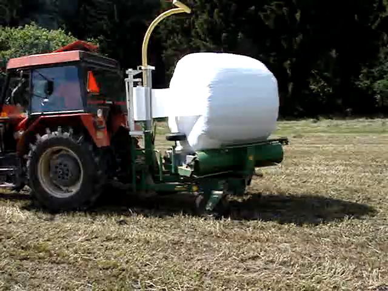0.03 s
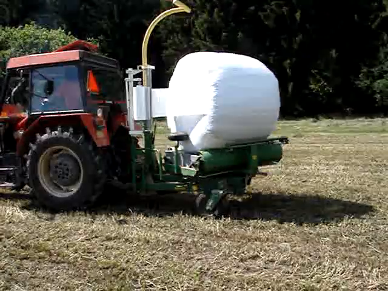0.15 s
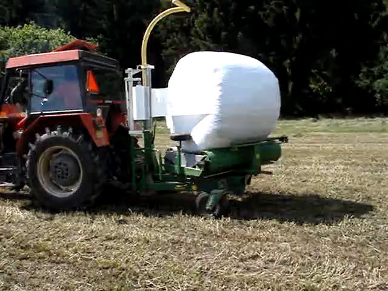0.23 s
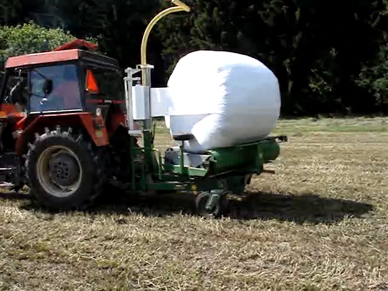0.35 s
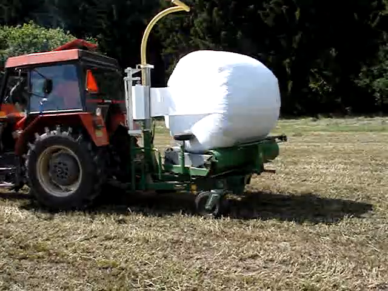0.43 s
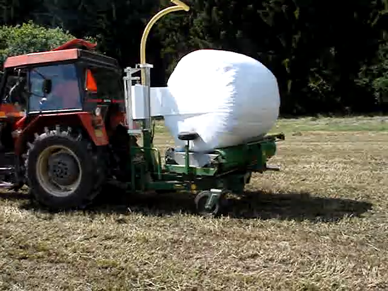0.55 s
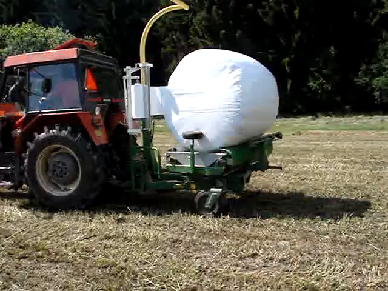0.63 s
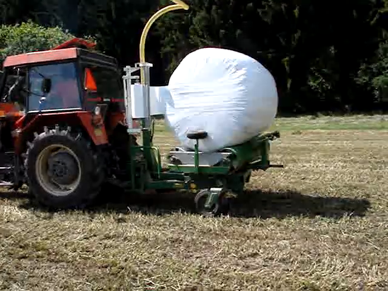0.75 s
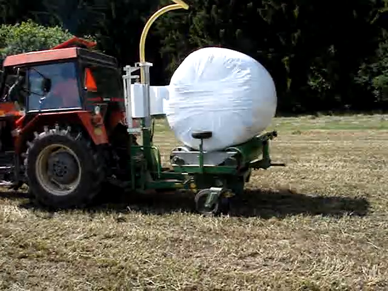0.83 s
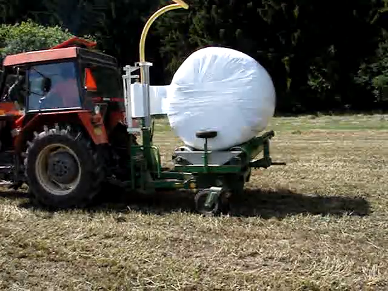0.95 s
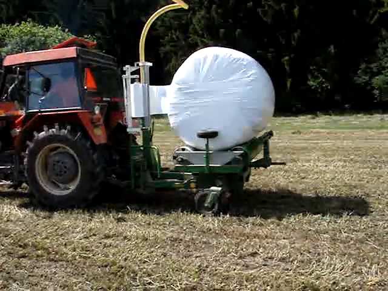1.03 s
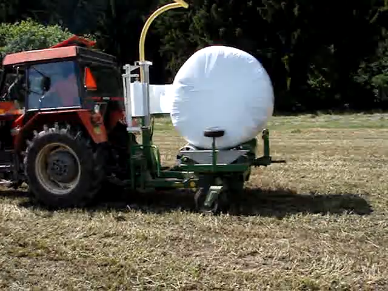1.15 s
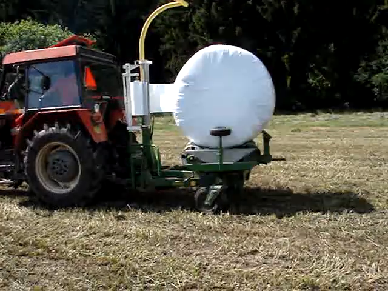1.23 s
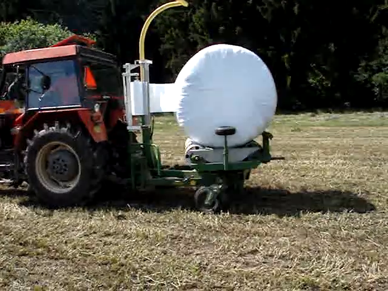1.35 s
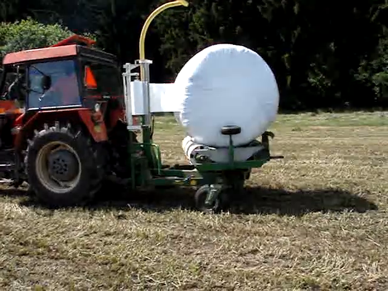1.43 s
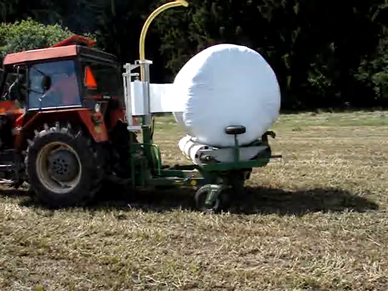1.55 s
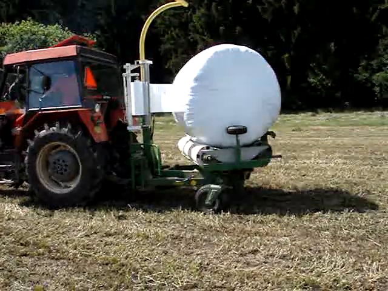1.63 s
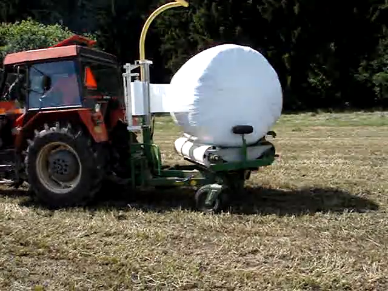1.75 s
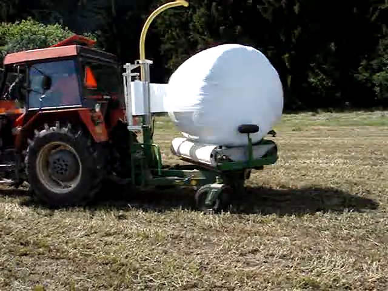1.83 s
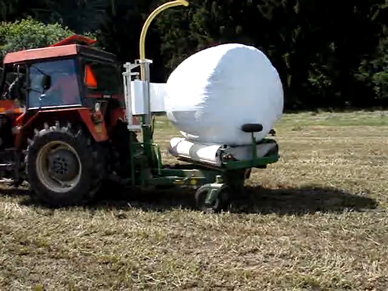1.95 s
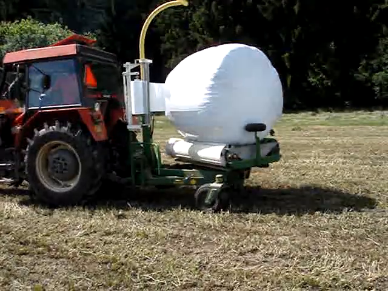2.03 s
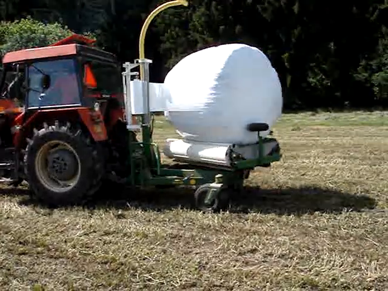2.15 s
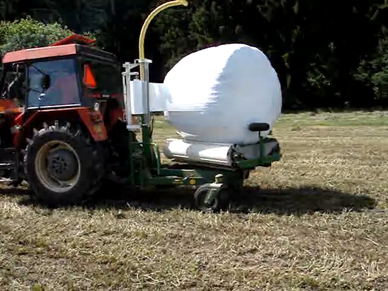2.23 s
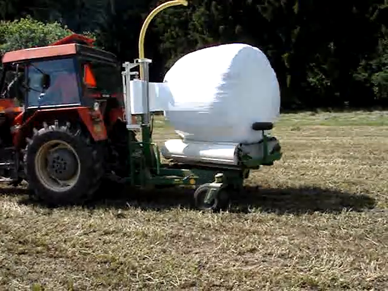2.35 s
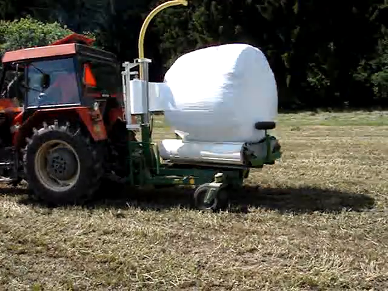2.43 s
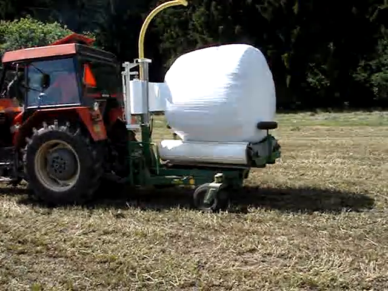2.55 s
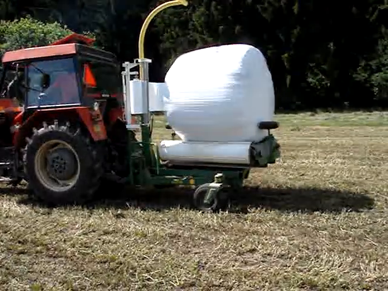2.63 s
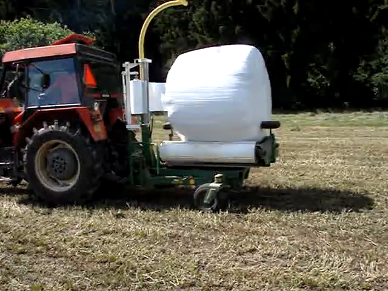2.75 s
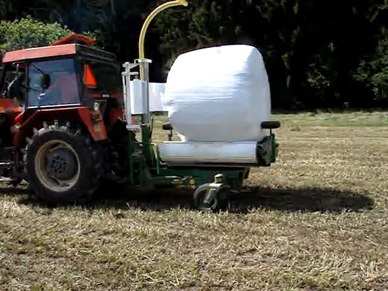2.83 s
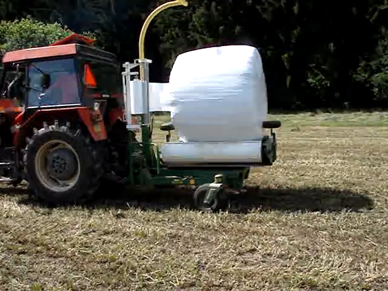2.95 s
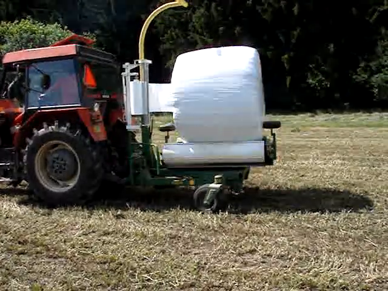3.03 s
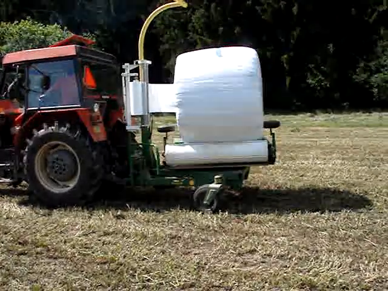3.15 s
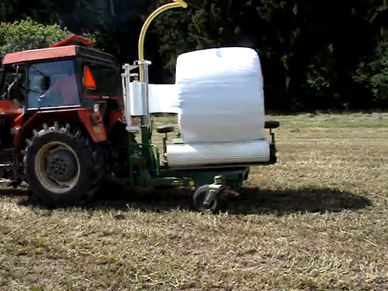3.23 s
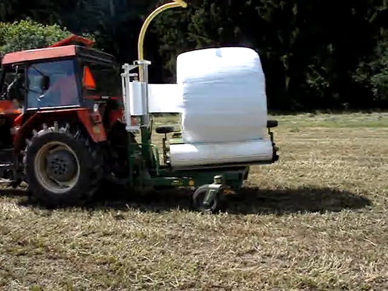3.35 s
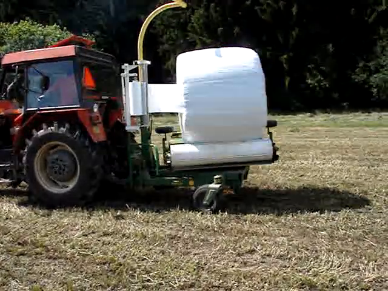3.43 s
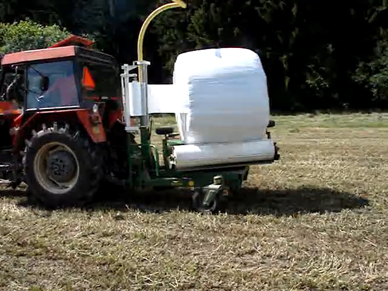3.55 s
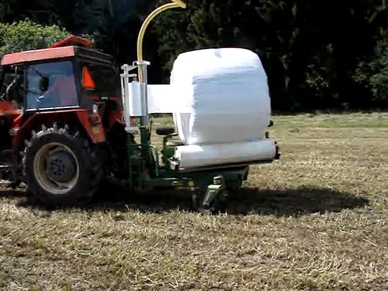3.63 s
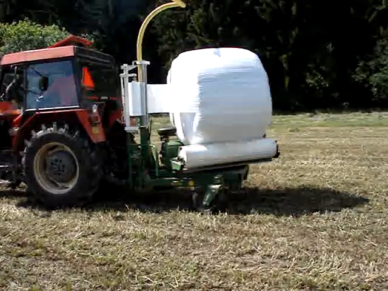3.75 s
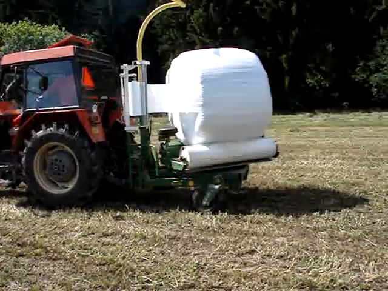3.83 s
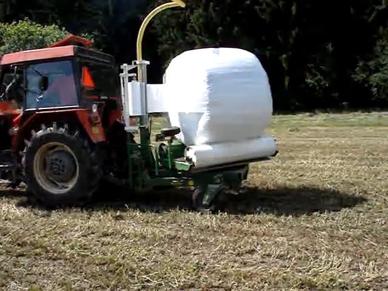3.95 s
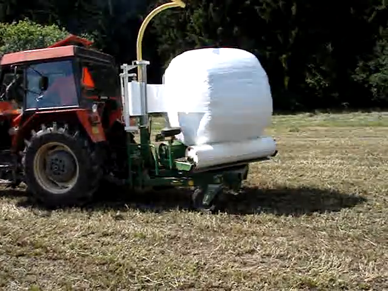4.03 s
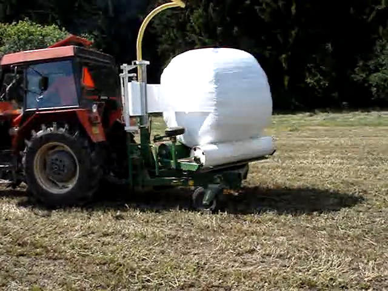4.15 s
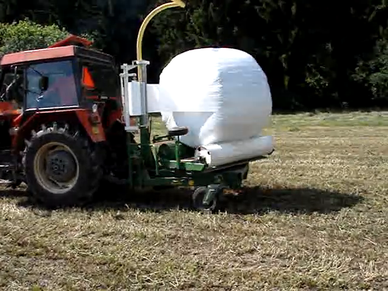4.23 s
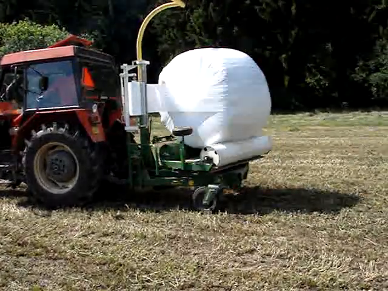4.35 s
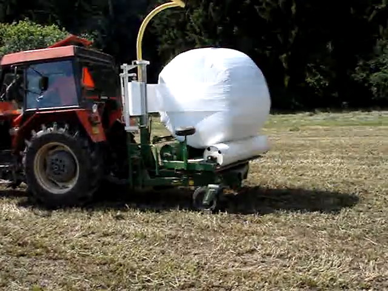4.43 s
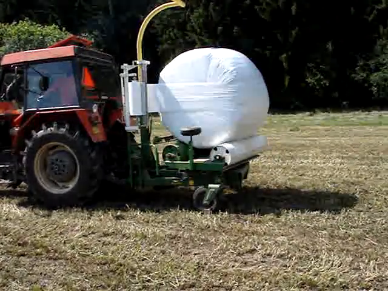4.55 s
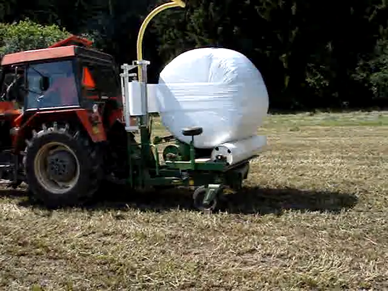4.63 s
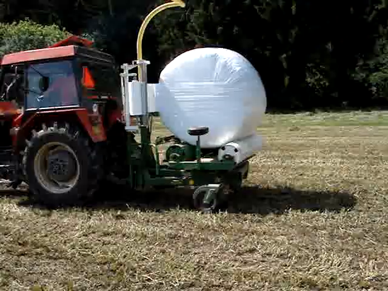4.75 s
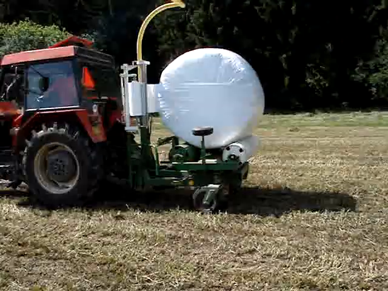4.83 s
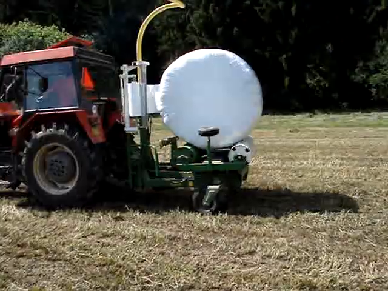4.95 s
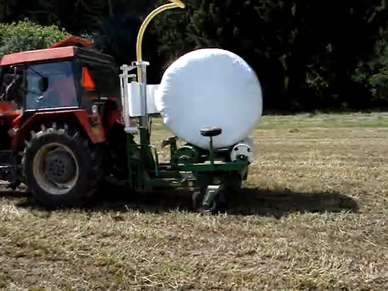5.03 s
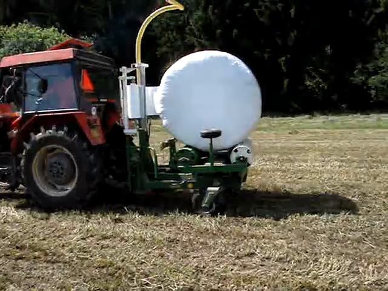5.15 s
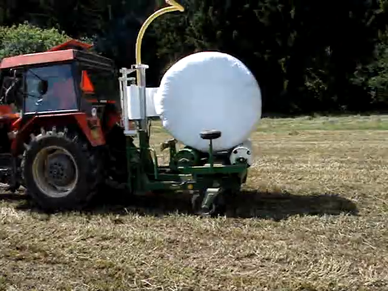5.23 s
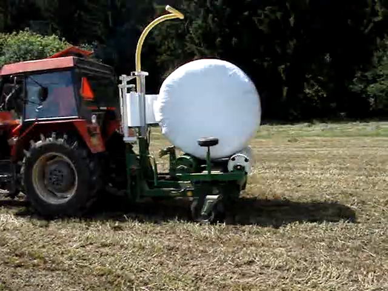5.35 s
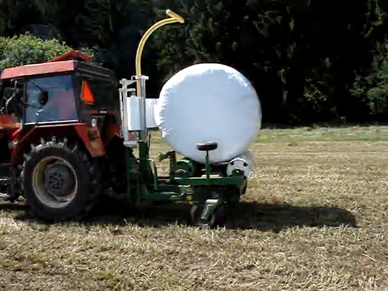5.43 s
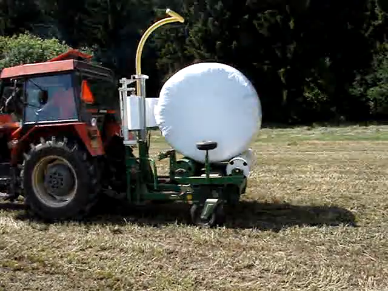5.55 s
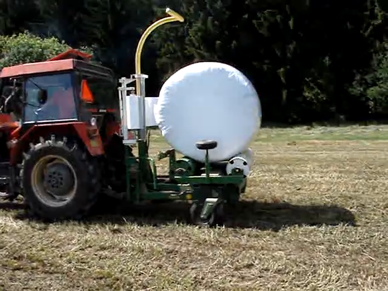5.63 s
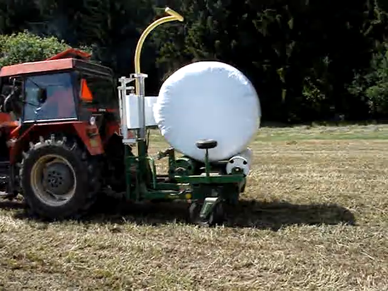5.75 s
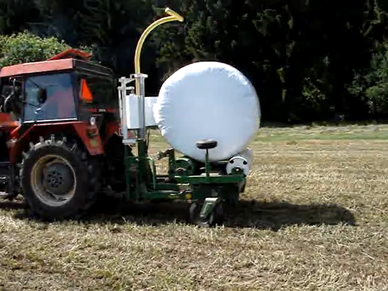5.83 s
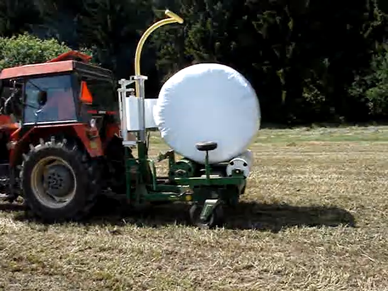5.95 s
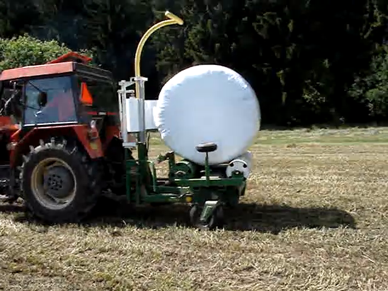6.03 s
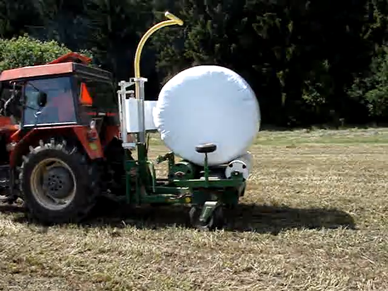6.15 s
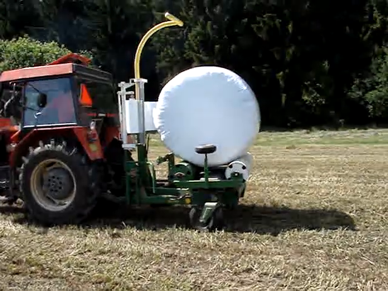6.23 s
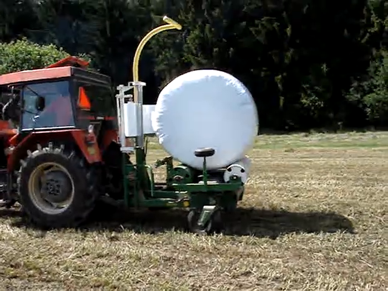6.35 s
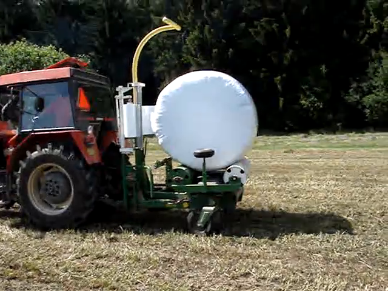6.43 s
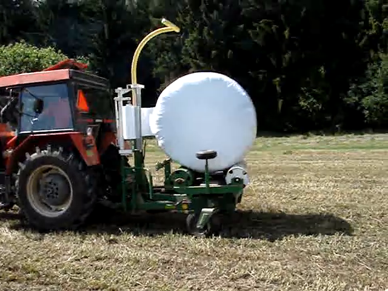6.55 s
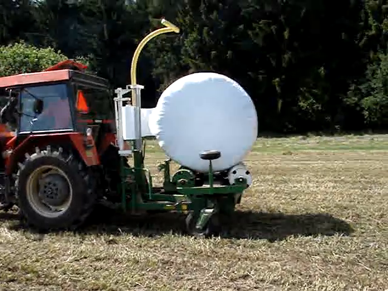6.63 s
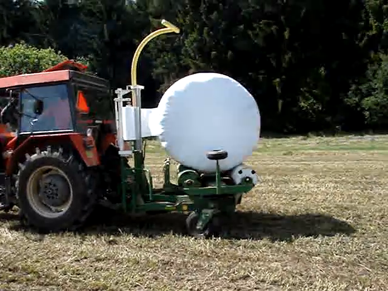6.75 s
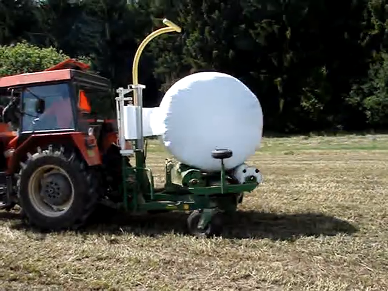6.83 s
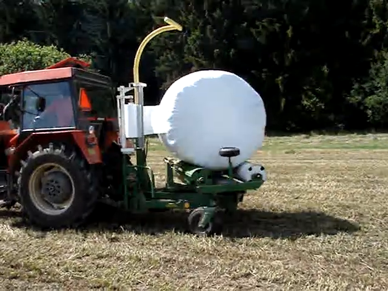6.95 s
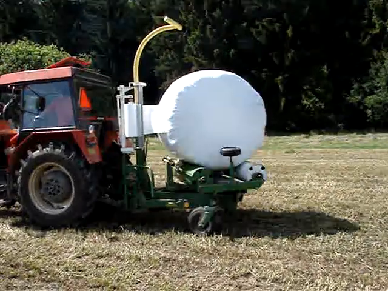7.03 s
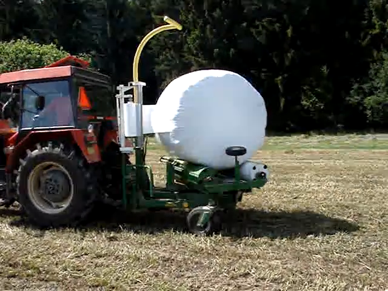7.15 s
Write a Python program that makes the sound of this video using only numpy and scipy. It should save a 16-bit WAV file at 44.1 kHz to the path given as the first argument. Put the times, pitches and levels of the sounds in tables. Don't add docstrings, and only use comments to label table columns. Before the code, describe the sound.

In an open field, stretch film peels off a roll with a dense, dry, ripping crackle and frequent sharp snaps. After about five seconds it brakes quickly to silence, exposing a knocking, humming diesel idle that slowly grows louder. A short steel scrape and clank follows, then the film grabs and tears loudly again. Single microphone, mono, with dulled top end.

```python
import sys
import numpy as np
from scipy import signal
from scipy.fft import rfft, irfft
from scipy.io import wavfile
from scipy.ndimage import uniform_filter1d

SR = 44100
rng = np.random.default_rng(int(sys.argv[2]) if len(sys.argv) > 2 else 0)


def gain_from_decibels(decibels):
    exponent = np.asarray(decibels, float) / 20
    return 10 ** exponent


def transcribe(u):
    v = np.clip(np.atleast_2d(u).T, -1, 1)
    q = np.round(v * 32767).astype(np.int16)
    wavfile.write(sys.argv[1], SR, q)


N = 317066
HALT_S, TIGHT_S = 5.22, 6.658

# frequency in Hz, width in Hz, level in dB.
WEB_MODES = [(355, 88, -26), (630, 157, -11), (787.4, 171, -3), (1118, 323, -7), (1267, 330, -1),
             (1434, 275, -6), (1704, 273, -7), (1929, 290, -10), (2340, 1500, -23), (2770, 1060, -10.5),
             (3265, 490, -12), (3658, 445, -11.5), (4720, 1600, -20), (6220, 1700, -15), (7146, 1800, -14),
             (8930, 2800, -24)]


def rms_one(x):
    return x / np.sqrt(np.mean(x ** 2) + 1e-20)


def drift(rate):
    r = np.exp(-40 * np.pi * rate / SR)
    slow = signal.lfilter([1], [1, -2 * r, r * r], rng.standard_normal(N // 20 + 2002))[2000:]
    return np.interp(np.arange(N) / 20, np.arange(len(slow)), rms_one(slow))


def step(at_s, width_s):
    return 0.5 + 0.5 * np.tanh((np.arange(N) / SR - at_s) / (2 * width_s))


def bumps(rows, width_s):
    t = np.arange(N) / SR
    return sum(db * np.exp(-((t - s) / width_s) ** 2) for s, db in rows)


def band_noise(low_hz, high_hz):
    sos = signal.butter(2, [low_hz, high_hz], "band", fs=SR, output="sos")
    return signal.sosfilt(sos, rng.standard_normal(N))


def dying(clicks, t60):
    return signal.lfilter([1], [1, -gain_from_decibels(-60 / (t60 * SR))], clicks + 1e-18)


def resonance(x, hz, width):
    r = np.exp(-np.pi * width / SR)
    zeros = (1 - r * r) / 2 * np.array([1, 0, -1])
    return signal.lfilter(zeros, [1, -2 * r * np.cos(2 * np.pi * hz / SR), r * r], x)


def mode(x, hz, width):
    return resonance(resonance(x, hz, width), hz, width)


def running_noise():
    # frequency in Hz, density in dB per Hz.
    spectrum = [(24, -53), (40, -18.5), (135, -3), (200, 2), (459, 0), (937, 4), (1080, -9), (1350, -3.5),
                (1740, 1.5), (2830, -4.5), (3250, -12), (3730, -11.5), (5140, -23), (6040, -13.5),
                (9800, -27.5), (12700, -69), (21600, -120)]
    curve_hz, curve_db = np.transpose(spectrum)
    hz = np.maximum(np.fft.rfftfreq(N, 1 / SR), 1)
    shape = gain_from_decibels(np.interp(np.log(hz), np.log(curve_hz), curve_db))
    return gain_from_decibels(-35.5) * rms_one(irfft(rfft(rng.standard_normal(N)) * shape, N))


def firings():
    firing_s, cycle_s = 6.025, 0.17425
    ahead_s = 0.0165 * (1 - step(5.43, 0.09))
    return 4 * (np.arange(N) / SR + ahead_s - firing_s) / cycle_s


def pipe_opening():
    # time in seconds, lift in dB.
    glimpses = [
        (3.6, 7.5),
        (4.5, 11),
    ]
    turning_db, resting_db = -2.5, 8.5
    resting = step(5.48, 0.069) - step(6.75, 0.048)
    return turning_db + (resting_db - turning_db) * resting + bumps(glimpses, 0.25)


def exhaust_hum(turn):
    # multiple of the firing rate, level in dB rms.
    orders = [(2, -67.5), (3, -62), (4, -63.5), (5, -65.5), (7, -61.5), (8, -57), (9, -54.5), (10, -72)]
    open_db = pipe_opening()
    hum = np.zeros(N)
    for order, db in orders:
        follow = 1 if order == 9 else 0.55
        level_db = db + follow * open_db + 1.2 * drift(8)
        hum += np.sqrt(2) * gain_from_decibels(level_db) * np.sin(2 * np.pi * (order * turn + rng.random()))
    return hum


def block_knocks(turn):
    # knock in dB, tilt in dB per octave, valve tap in dB.
    cylinders = [(1, 4, -18.5), (-1, 4, -15), (-2, 5.5, -5), (-3, 5.5, -22)]
    # frequency in Hz, width in Hz, level in dB.
    block_modes = [(654, 250, -6), (840, 280, -7), (1347, 400, 1), (1530, 600, -9), (2030, 100, -15),
                   (2217, 160, -9.5), (2776, 670, -7.5), (3686, 490, -11), (4360, 740, -18.5),
                   (5700, 1300, -24), (8560, 2400, -35.5)]
    knock_db, scatter_db = -17.0, 1.3
    ring_s, rise_s = 0.091, 0.0013
    tap_at = 0.54
    fire = np.diff(np.floor(turn), prepend=0) == 1
    tap = np.diff(np.floor(turn - tap_at), prepend=0) == 1
    level_db, tilt_db, tap_db = np.array(cylinders)[np.floor(turn).astype(int) % 4].T
    hits = fire + tap * gain_from_decibels(tap_db)
    lag = np.exp(-1 / (rise_s * SR))
    knocks = np.zeros(N)
    for hz, width, db in block_modes:
        hit_db = level_db + tilt_db * np.log2(hz / 1400) + rng.normal(0, scatter_db, N)
        tail = dying(hits * gain_from_decibels(hit_db), ring_s * (1400 / hz) ** 0.053)
        swell = signal.lfilter([1 - lag], [1, -lag], tail)
        ring = mode(swell * rng.standard_normal(N), hz, width)
        knocks += gain_from_decibels(db + knock_db) * ring * np.sqrt(3000 / width)
    return knocks


def diesel():
    turn = firings()
    return block_knocks(turn) + exhaust_hum(turn) + running_noise()


def recorder_gain():
    t = np.arange(N) / SR
    held_db, recover_db, recover_s, clamp_s = -11.5, 14, 1, 0.14
    rise = 1 - np.exp(-np.clip(t - HALT_S, 0, TIGHT_S - HALT_S) / recover_s)
    return held_db + recover_db * rise * np.exp(-np.maximum(t - TIGHT_S, 0) / clamp_s)


def linkage():
    # frequency in Hz, level in dB, t60 in seconds.
    partials = [(565, -43, .8), (1830, -25, .17), (1250, -31, .12), (2600, -33, .1), (3900, -31, .14)]
    clank_s, swell_s = 6.434, 0.011
    t = np.maximum(np.arange(N) / SR - clank_s, 0)
    swell = t / swell_s * np.exp(1 - t / swell_s)
    scrape = band_noise(900, 4200) + 0.2 * band_noise(5500, 9000)
    rings = sum(gain_from_decibels(db - 60 * t / t60) * np.sin(2 * np.pi * hz * t) for hz, db, t60 in partials)
    return gain_from_decibels(-19) * swell * scrape + rings * (1 - np.exp(-t / swell_s))


def peel():
    # time in seconds, level in dB.
    pull = [(0, -24), (.3, -26), (.75, -25.5), (1.05, -23.5), (1.3, -25.5), (1.7, -25.5), (2.4, -24.5),
            (2.85, -24.5), (3.1, -25.5), (3.7, -25), (4.1, -24.5), (4.75, -25.5), (5.1, -25.5)]
    # time in seconds, level in dB.
    pull_again = [
        (6.7, -28),
        (6.79, -22),
        (7.05, -23),
        (7.16, -23.5),
        (7.19, -18),
    ]
    # time in seconds, loss in dB.
    dull = [
        (.75, 2.8),
        (2.03, 2.2),
        (2.55, 4.),
        (4.0, 1.8),
    ]
    t = np.arange(N) / SR
    pull_s, pull_level_db = np.transpose(list(pull) + list(pull_again))
    pull_db = np.interp(t, pull_s, pull_level_db)
    swing_db = pull_db + 25
    drum_db = -32 + 0.081 * swing_db
    bright_db = -26 + 0.45 * swing_db - bumps(dull, 0.098)
    running = np.array([pull_db, drum_db, bright_db])
    brake_s, lose_s = np.c_[[5.14, 5.21, 5.18]], np.c_[[0.13, 0.065, 0.1]]
    braked = running - 20 * (np.maximum(t - brake_s, 0) / lose_s) ** 2
    creeping = np.c_[[-45, -50, -34]] - 108 * np.maximum(TIGHT_S - t, 0)
    grab = np.clip((t - TIGHT_S) / 0.014, 0, 1)
    crackle, drum, bright = np.maximum(braked, creeping) * (1 - grab) + running * grab
    return crackle, drum - crackle, bright - crackle


def film_snaps():
    # time in seconds, peak in dB.
    snaps = [(0.1121, -12), (0.1905, -11), (0.2828, -8), (0.3301, -13), (0.5327, -11), (0.7447, -13),
             (1.0316, -9), (1.1059, -9), (1.1907, -12), (1.3563, -12), (2.0712, -8), (2.1281, -12),
             (2.1999, -12), (2.4733, -9), (2.5391, -8), (2.587, -9), (2.6589, -12), (2.7531, -12),
             (2.8574, -10), (3.5798, -11), (3.8038, -11), (3.9544, -12), (4.0173, -10), (4.0936, -11),
             (4.1609, -9), (4.2497, -10), (4.3834, -13), (4.8374, -11), (4.9417, -10), (5.0719, -11)]
    # time in seconds, peak in dB.
    restart = [
        (6.6600, -8),
        (6.6744, -13),
        (6.6844, -12),
        (6.7004, -12),
        (6.7411, -11),
        (6.784, -9),
        (6.8964, -8),
        (6.9556, -11),
        (7.0174, -11),
    ]
    snap_s, peak_db = np.transpose(list(snaps) + list(restart))
    clicks = np.zeros(N)
    np.add.at(clicks, np.clip((snap_s * SR).astype(int), 0, N - 1), gain_from_decibels(peak_db))
    burst = dying(clicks, 0.028) * rng.standard_normal(N)
    return gain_from_decibels(10) * sum(gain_from_decibels(db) * mode(burst, hz, width) for hz, width, db in WEB_MODES)


def film_crackle():
    # time in seconds, lift in dB.
    taut = [
        (.7, 3.3),
        (1.5, 2.4),
        (2.4, 1.8),
        (4.15, 4.),
        (5.05, 1.7),
    ]
    clicks_per_s, clump_db, spread_db = 8000.0, 0.85, 2.5
    own, flicker_db = 1.22, 0.77
    level_db, drum_db, bright_db = peel()
    born = rng.random(N) < clicks_per_s * gain_from_decibels(clump_db * drift(150)) / SR
    sizes_db = spread_db * np.minimum(rng.exponential(1, N), 4)
    clumps_db = clump_db * (drift(100) + 0.37 * drift(23))
    singing_db = bumps(taut, 0.17)
    shared = rng.standard_normal(N)
    parts = np.zeros((3, N))
    for k, (hz, width, db) in enumerate(WEB_MODES):
        shake_db = db + sizes_db + clumps_db + flicker_db * drift(18.7)
        if 1600 < hz < 2100:
            shake_db = shake_db + singing_db
        shake = born * (shared + own * rng.standard_normal(N)) * gain_from_decibels(shake_db)
        parts[np.searchsorted([950, 2400], hz)] += mode(shake, hz, width) * (-1) ** k
    drumming, body, treble = [rms_one(part) for part in parts]
    return gain_from_decibels(level_db) * (gain_from_decibels(drum_db) * drumming + body + gain_from_decibels(bright_db) * treble)


def scene():
    engine = gain_from_decibels(recorder_gain()) * diesel()
    mono = engine + linkage() + film_snaps() + film_crackle()
    return np.array([mono, mono])


def thinned_treble(x, below_db, from_hz):
    hz, _, z = signal.stft(x, SR, nperseg=384)
    bands = len(hz) // 4
    power = (np.abs(z[:4 * bands]) ** 2).reshape(bands, 4, -1).mean(axis=1)
    power = uniform_filter1d(power, size=2, axis=1)
    around = uniform_filter1d(uniform_filter1d(power, size=11, axis=1), size=3, axis=0)
    uneven = uniform_filter1d(rng.standard_normal(power.shape), size=2, axis=1)
    threshold_db = below_db + 1.7 * uneven
    muted = (power < around * gain_from_decibels(-2 * threshold_db)) & (hz[:4 * bands:4, None] > from_hz)
    z[:4 * bands] *= np.where(np.repeat(muted, 4, axis=0), 0.02, 1)
    return signal.istft(z, SR, nperseg=384)[1][:N]


def low_pass(x):
    return signal.sosfilt(signal.butter(12, 10600, fs=SR, output="sos"), x)


def record(dry):
    flutter = signal.sosfilt(signal.butter(1, 8, "high", fs=SR, output="sos"), dry[0] ** 2)
    mono = thinned_treble(dry[0] - 0.3 * flutter, below_db=3.9, from_hz=4700)
    cut = signal.sosfilt(signal.ellip(12, 0.5, 85, 9990, fs=SR, output="sos"), mono)
    return low_pass(np.array([cut, cut]))


dry = scene()
out = record(dry)
transcribe(out)
```